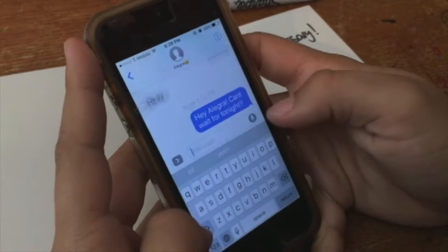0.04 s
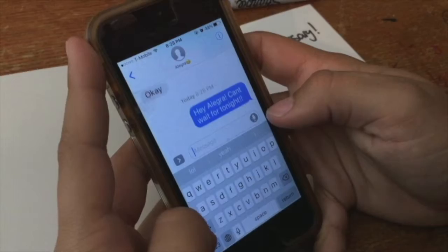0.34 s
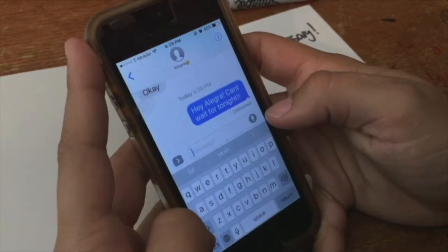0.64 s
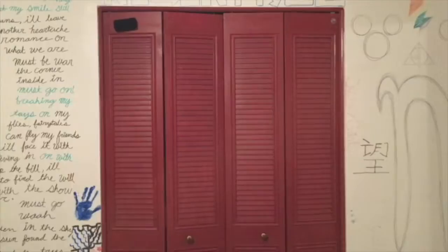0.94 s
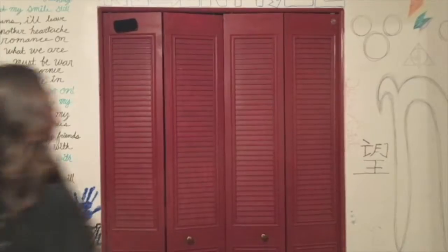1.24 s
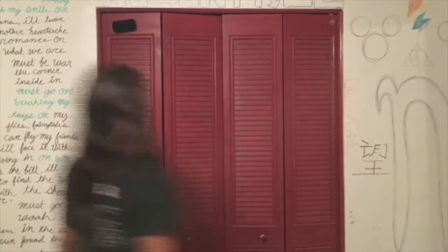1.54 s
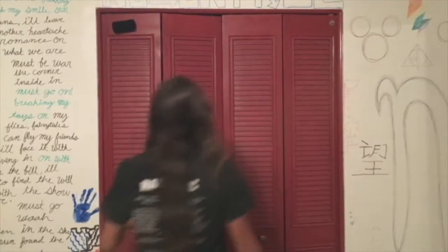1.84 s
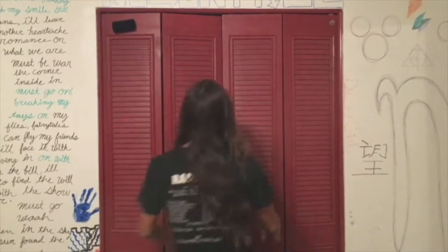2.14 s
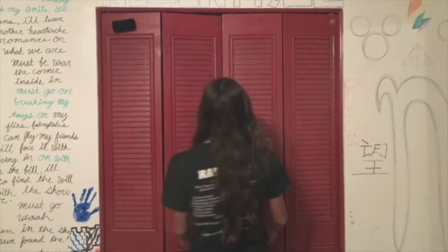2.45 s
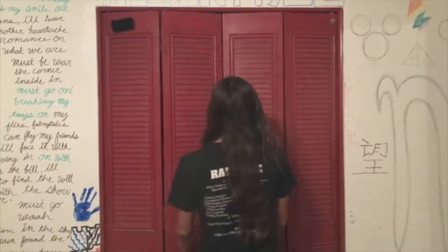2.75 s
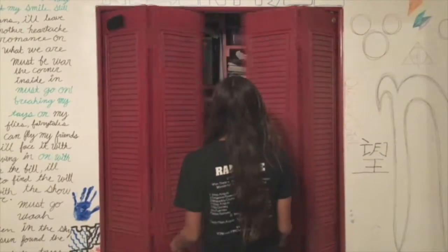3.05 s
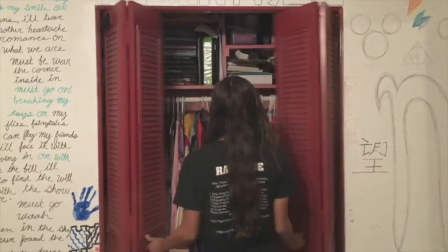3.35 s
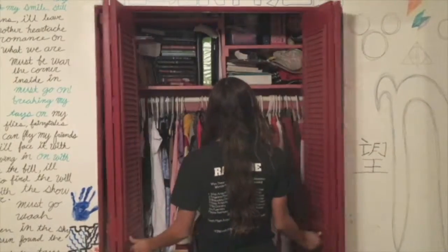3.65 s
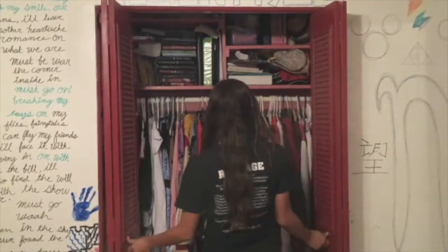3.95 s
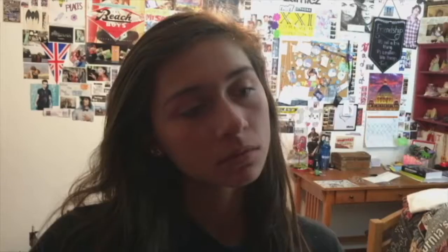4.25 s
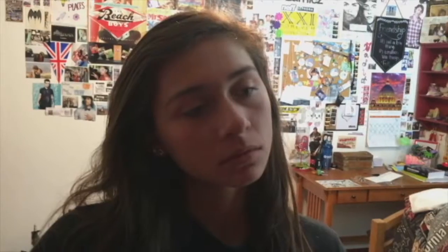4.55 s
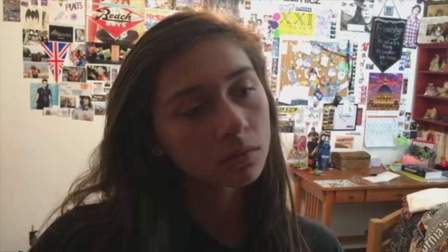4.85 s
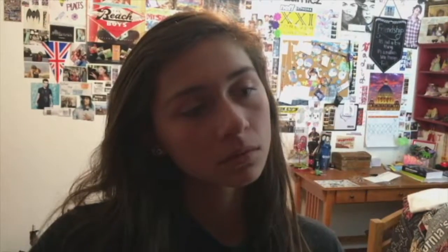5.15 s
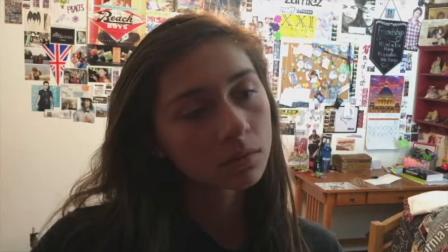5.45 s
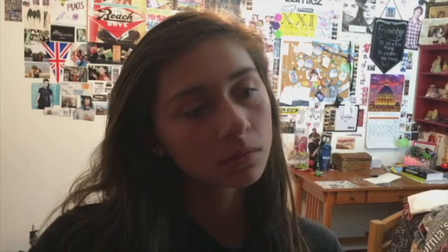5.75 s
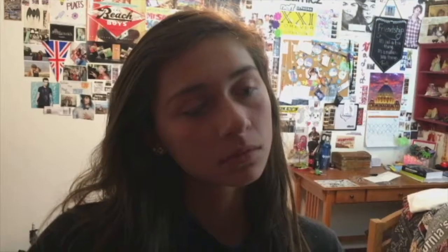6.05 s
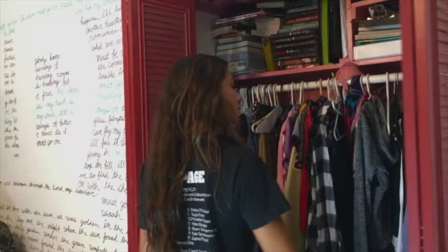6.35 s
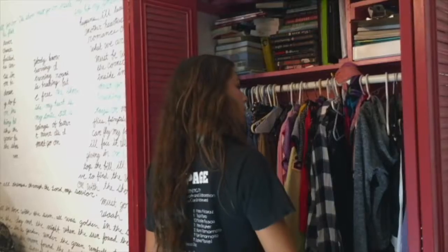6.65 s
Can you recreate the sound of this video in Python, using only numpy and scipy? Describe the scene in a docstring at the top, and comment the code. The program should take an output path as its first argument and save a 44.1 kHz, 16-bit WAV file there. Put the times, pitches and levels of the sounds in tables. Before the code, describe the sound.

After soft steps, folding wooden closet doors clatter and scrape open in a bedroom, and later plastic hangers tap lightly.

```python
"""Louvered wooden bifold closet doors pulled open in a small bedroom, after a few soft steps.
The doors pop free with a boom as the panels flex, and the loose slats rattle. Guide pins scrape along
the dry track, ring it, and squeal and judder by stick-slip. Doors and room tone then stop dead;
quiet room tone fades in, with a faint bump and a few light hanger clicks."""
import sys
import numpy as np
from scipy import signal
from scipy.fft import rfft, irfft, next_fast_len
from scipy.io import wavfile

SR = 44100
rng = np.random.default_rng(int(sys.argv[2]) if len(sys.argv) > 2 else 0)


def generate_wav(signal):
    """Clip the signal to [-1, 1] and save it as 16-bit WAV at the path in sys.argv[1]."""
    frames = np.transpose(np.atleast_2d(signal))
    scaled = np.clip(frames, -1, 1) * 32767
    pcm = np.round(scaled).astype(np.int16)
    wavfile.write(sys.argv[1], SR, pcm)


N = 299439
TIME = np.arange(N) / SR
BREAK_S, CUTOFF_HZ = 4.089, 15820
RUMBLE_DB, RUMBLE_DB_PER_DB = -45, 1.03   # panel drive at nominal drag; slope against drag
# metal track modes: f/Hz, level/dB
TRACK_MODES = [(640.6, -37), (802.1, -52.5), (1044, -48.5), (1211, -50), (1287, -40.5), (1620, -43),
               (1701, -43.5), (1857, -46), (1922, -43), (2099, -48.5), (2353, -54.5), (2568, -57.5)]


def from_db(db):
    """Decibels to gain."""
    return 10 ** (np.asarray(db) / 20)


def unit_rms(x):
    """Scale to rms 1."""
    return x / np.sqrt(np.mean(x ** 2) + 1e-20)


def at_hz(points, hz):
    """Interpolate a table over log frequency."""
    f, value = np.transpose(points)
    return np.interp(np.log(hz + 1e-3), np.log(f), value)


def band(x, low_hz, high_hz, order=2):
    """Causal band-pass."""
    sos = signal.butter(order, [low_hz, min(high_hz, .45 * SR)], "band", fs=SR, output="sos")
    return signal.sosfilt(sos, x + 1e-18)


def coloured(x, spectrum):
    """Shape a steady signal's spectrum; rms 1."""
    size = next_fast_len(N)
    hz = np.arange(size // 2 + 1) * SR / size
    return unit_rms(irfft(rfft(x, size) * from_db(at_hz(spectrum, hz)), size)[:N])


def noise():
    """White noise."""
    return rng.standard_normal(N)


def drift(rate_hz):
    """Random wander between unit-variance knots."""
    knots = rng.standard_normal(N // 4)
    return np.interp(TIME * rate_hz, np.arange(len(knots)), knots)


def ring(push, hz, t60_s):
    """One damped mode; a unit impulse rings at amplitude 1."""
    r, w = from_db(-60 / (t60_s * SR)), 2 * np.pi * hz / SR
    return signal.lfilter([0, np.sin(w)], [1, -2 * r * np.cos(w), r * r], push + 1e-18)


def impulses(times_s, levels_db):
    """One-sample pushes."""
    clicks = np.zeros(N)
    clicks[np.round(times_s * SR).astype(int)] = from_db(levels_db)
    return clicks


def bursts(times_s, levels_db, t60_s, rise_s):
    """Envelope of decaying blows, summed in power."""
    power = np.zeros(N)
    for s, db in zip(times_s, levels_db):
        start = round(s * SR)
        age = TIME[:min(SR // 2, N - start)]
        blow = from_db(db - 60 * age / t60_s) * (1 - np.exp(-age / rise_s))
        power[start:start + len(age)] += blow ** 2
    return np.sqrt(power)


def envelope(start_s, rise_s, hold_s, t60_s):
    """Linear attack, hold, exponential release."""
    age = TIME - start_s
    return np.clip(age / rise_s, 0, 1) * from_db(-60 * np.maximum(age - rise_s - hold_s, 0) / t60_s)


def swell(centre_s, width_s):
    """Gaussian rise and fall."""
    return np.exp(-((TIME - centre_s) / width_s) ** 2 / 2)


def bedroom(x, wet_db):
    """Direct sound plus a dense tail that dies sooner in the treble."""
    # room decay: f/Hz, t60/s
    decay = [(100, 0.39), (1000, 0.42), (5000, 0.17), (15000, .17)]
    age, edges_hz = TIME[:SR // 2], np.geomspace(60, 18000, 9)
    tail = 0
    for low, high in zip(edges_hz, edges_hz[1:]):
        t60_s = at_hz(decay, np.sqrt(low * high))
        tail += band(rng.standard_normal(len(age)), low, high) * from_db(-60 * age / t60_s)
    tail *= age > .003
    wet = from_db(wet_db)
    return (x + wet * signal.fftconvolve(x, tail / np.linalg.norm(tail))[:N]) / np.hypot(1, wet)


def room_tone():
    """Steady low rumble with faint hiss."""
    # room tone spectrum: f/Hz, density/dB
    spectrum = [(12, -35), (20, -11), (49, 0), (68, -6.5), (103, -21.5), (144, -21.5), (185, -27),
                (213, -26.5), (352, -28.5), (519, -36.5), (614, -34.5), (4550, -38.5), (4950, -42),
                (6020, -39.5), (15500, -40.5)]
    return from_db(-57.5) * coloured(noise(), spectrum)


def late_room_tone():
    """Quieter room tone, fading in after the break."""
    # room tone spectrum: f/Hz, density/dB
    spectrum = [(12, -49), (20, -8.5), (43, 1), (65, -8), (177, -18.5), (277, -24.5), (310, -23.5),
                (446, -28), (527, -32.5), (574, -30), (923, -32), (1060, -31), (4940, -36), (14700, -40.5),
                (16000, -39)]
    # fade-in: t/s, gain/dB
    fade = [(4.09, -29.5), (4.2, -18.5), (4.35, -12), (4.6, -6.5), (4.85, -4)]
    return from_db(-58.5 + np.interp(TIME, *np.transpose(fade))) * coloured(noise(), spectrum)


def bump():
    """A faint, muffled bump."""
    # bump spectrum: f/Hz, density/dB
    spectrum = [(30, -4), (110, 1), (560, -15.5), (900, -26), (3000, -60.5)]
    thud = from_db(-61) * swell(centre_s=5.46, width_s=.045) * coloured(noise(), spectrum)
    return bedroom(thud, wet_db=-9)


def steps():
    """Soft footfalls and weight shifts: a brush of cloth and a dull thud."""
    # footfalls: t/s, brush/dB, width/s, thud/dB
    footfalls = [(1.062, -64, .041, -72), (1.139, -61, .012, -63), (1.297, -66, 0.027, -69),
                 (1.386, -63.5, 0.013, -74), (1.503, -62.5, 0.038, -73.5), (1.689, -56.5, 0.022, -68.5),
                 (1.932, -66, 0.097, -62.5)]
    # brushing clothes: f/Hz, density/dB
    cloth_spectrum = [(300, -18), (700, -4.5), (1400, 0.5), (2300, -3.5), (4000, -9.5), (7000, -16.5),
                      (16000, -23)]
    brush = sum(from_db(db) * swell(s, width_s) for s, db, width_s, _ in footfalls)
    thud = sum(from_db(db) * swell(s, width_s) for s, _, width_s, db in footfalls)
    cloth = coloured(noise(), cloth_spectrum) * from_db(2.5 * drift(180))
    return bedroom(brush * cloth + thud * unit_rms(band(noise(), 110, 420)), wet_db=-7.5)


def hangers():
    """Plastic hangers touch in a quick run of light taps."""
    # contacts: t/s, level/dB
    contacts = [(6.3418, -42.5), (6.346, -45), (6.3587, -44), (6.3777, -47), (6.402, -48.5)]
    # plastic tap: f/Hz, density/dB
    spectrum = [(290, -49), (500, -26.5), (819, -9), (1230, -8.5), (1550, -13), (2040, -2), (2770, -10),
                (3020, -10), (4030, -4.5), (5970, -8.5), (7530, -18), (16000, -19)]
    s, db = np.transpose(contacts)
    taps = coloured(noise(), spectrum) * bursts(s, db - 7, t60_s=.07, rise_s=.0004)
    return bedroom(taps, wet_db=-4)


def swing_speed():
    """Speed of the folding doors, 0-1."""
    start_s, rise_s, run_s, slow_s = 2.922, .11, .43, .23
    return np.interp(TIME, np.cumsum([start_s, rise_s, run_s, slow_s]), [0, 1, 1, 0])


def shudder_db():
    """Extra drag as the doors pop free and as they settle."""
    # shudders: t/s, width/s, gain/dB
    shudders = [(2.269, .055, 6), (3.86, 0.042, 8)]
    return sum(db * swell(s, width_s) for s, width_s, db in shudders)


def drag_gain(level_db, db_per_db):
    """Gain that follows pin drag once the pull starts; level_db at nominal drag."""
    # pin drag in the track: t/s, level/dB
    drag = [(2.63, -42), (2.662, -46), (2.67, -40), (2.776, -45.5), (2.816, -39), (2.872, -44),
            (3.082, -47), (3.094, -42), (3.244, -34), (3.51, -55.5), (3.536, -46), (3.602, -58),
            (3.68, -61.5)]
    pull_s, rise_s = 2.065, .038
    pull_db, nominal_db, settled_db = -54, -43, -65
    curve = [(pull_s, pull_db), *drag, (BREAK_S, settled_db)]
    drag_db = np.interp(TIME, *np.transpose(curve)) + shudder_db()
    onset = np.clip((TIME - pull_s) / rise_s, 0, 1)
    return onset * from_db(level_db + db_per_db * (drag_db - nominal_db))


def glide():
    """Steady friction keeps the track's high resonances singing during the swing."""
    # high track resonances: f/Hz, width/Hz, level/dB
    resonances = [(5780, 940, 1.5), (14440, 4200, -4)]
    sing = sum(from_db(db) * unit_rms(band(noise(), hz - width / 2, hz + width / 2))
               for hz, width, db in resonances)
    friction = swing_speed() * drag_gain(-54.5, db_per_db=.26) * from_db(2 * drift(70))
    return bedroom(friction * sing, wet_db=0)


def slide():
    """Pins catch densely on the dry track, shaking panels and track; speed brightens the scrape."""
    # scraped panels: f/Hz, density/dB
    spectrum = [(59, -33.5), (100, -0.5), (170, -13.5), (224, -2.5), (424, -6.5), (471, -8), (547, -6.5),
                (721, -2.5), (801, -4.5), (1480, -5), (2220, -11.5), (5080, -13), (10700, -27.5),
                (16000, -19.5)]
    catches_per_s = 1000
    sizes = from_db(3 * np.minimum(rng.exponential(1, N), 4)) * rng.choice([-1, 1], N)
    catches = unit_rms(sizes * (rng.random(N) < catches_per_s / SR))
    friction = (catches + .4 * noise()) * from_db(2.2 * drift(55))
    track = unit_rms(sum(from_db(db) * ring(friction, hz, t60_s=.072) for hz, db in TRACK_MODES))
    shake = bedroom(coloured(friction, spectrum), wet_db=-2) + from_db(-11) * track
    low, mid, high = (unit_rms(band(shake, *edges_hz, order=3))
                      for edges_hz in [(110, 400), (400, 2600), (3300, 21000)])
    speed = swing_speed()
    rumble = drag_gain(RUMBLE_DB, RUMBLE_DB_PER_DB) * from_db(-5 * speed) * low
    scrape = drag_gain(-43, db_per_db=1) * mid
    hiss = drag_gain(-57.5, db_per_db=.85) * from_db(10.5 * speed + .8 * shudder_db()) * high
    return rumble + scrape + hiss


def squeal(start_s, length_s, peak_at, start_hz, middle_hz, end_hz, level_db, overtone_db, rough):
    """Fast stick-slip: a tone swells and fades along a pitch arc; uneven slips smear its partials."""
    jitter, smear_rad, fall_db, flutter_db, max_partials = .04, 1.2, 2, 4.6, 11
    live = (TIME > start_s) & (TIME < start_s + length_s)
    progress = (TIME[live] - start_s) / length_s
    arc_hz = np.polyval(np.polyfit([0, .5, 1], [start_hz, middle_hz, end_hz], 2), progress)
    pitch_hz = arc_hz * (1 + jitter * rough * (drift(900) + .4 * drift(200))[live])
    phase = 2 * np.pi * np.cumsum(pitch_hz) / SR
    edge_db = -23 + 15.5 * rough   # rough squeals hold up at both ends
    db = level_db + edge_db * np.interp(progress, [0, peak_at, 1], [1, 0, 1])
    tone = np.zeros(N)
    for k in range(1, min(max_partials, int(CUTOFF_HZ / arc_hz.min())) + 1):
        partial_db = (k > 1) * (overtone_db - fall_db * (k - 2)) + flutter_db * drift(170)[live]
        partial = np.sin(k * phase + smear_rad * rough * drift(1500)[live])
        tone[live] += from_db(db + partial_db) * partial * (k * pitch_hz < SR / 2)
    return tone


def squeals():
    """Pins chirp and squeal, raspier as they bind; a hinge squeaks last."""
    # pin and hinge squeals: t/s, length/s, peak position/0-1, start f/Hz, middle f/Hz, end f/Hz,
    # level/dB, overtone/dB, roughness/0-1
    slips = [(2.357, .095, .48, 5836, 6080, 6050, -38, 2.5, .34),
             (2.408, 0.14, .22, 5260, 5096, 5103, -35.5, -.5, 0.33),
             (2.474, .165, .5, 6070, 5590, 7153, -36, -0.5, .62),
             (2.853, .2, 0.57, 6350, 4050, 3147, -40.5, -7, 0.92),
             (3.899, .145, 0.39, 880, 1009, 1200, -55, -2, 0.4)]
    # pin chirps: t/s, f/Hz, level/dB, t60/s
    pin_chirps = [(2.238, 7650, -42.5, 0.11), (2.274, 8500, -37, 0.098), (2.294, 7700, -44, .09),
                  (2.335, 15200, -30, 0.035), (2.461, 7800, -45.5, .1)]
    tones = sum(squeal(*row) for row in slips)
    chirps = sum(unit_rms(band(noise(), .97 * hz, 1.03 * hz)) * bursts([s], [db], t60_s, rise_s=.0014)
                 for s, hz, db, t60_s in pin_chirps)
    return from_db(.5) * bedroom(tones + chirps, wet_db=-4)


def judder():
    """A binding pin slips hundreds of times a second; the track's ring darkens as pressure eases."""
    start_s, rise_s, slips_per_s = 2.488, .019, 325
    high_hz, low_hz, first_octave_s = 1900, 700, .087
    # slip rasp: f/Hz, density/dB
    spectrum = [(1700, 0), (2800, -3), (4050, -0.5), (5500, -8), (8000, -9.5), (15000, -7.5)]
    centre_hz = np.maximum(high_hz * .5 ** (((TIME - start_s) / first_octave_s) ** 2), low_hz)
    tones = power = 0
    for hz, db in TRACK_MODES:
        weight = from_db(db - 5.9 * np.log2(hz / centre_hz) ** 2)
        tones += weight * np.sin(2 * np.pi * np.cumsum(hz * (1 + .007 * drift(200))) / SR)
        power += weight ** 2 / 2
    slip_count = np.floor(np.cumsum(slips_per_s * (1 + .05 * drift(300))) / SR)
    slips = np.diff(slip_count, prepend=0) * from_db(3.5 * drift(300))
    rasp = unit_rms(band(coloured(slips, spectrum), 1700, 16000))
    ring_gain = from_db(-27) * envelope(start_s, rise_s, hold_s=.05, t60_s=.16)
    rasp_gain = from_db(-29.5) * envelope(start_s, rise_s, hold_s=.016, t60_s=.12)
    return ring_gain * tones / np.sqrt(power) + bedroom(rasp_gain * rasp, wet_db=2)


def door_boom():
    """Shoves and track drag sway the hanging doors in two low modes; jolts set the frames humming."""
    # shoves flexing the door: t/s, level/dB, quick-mode share/0-1
    shoves = [(1.831, -38.5, 0.26), (1.971, -38.5, 0.17), (2.167, -20, 0), (2.198, -11.5, 0.04),
              (2.273, -22.5, .95), (2.384, -19.5, .62), (2.579, -34, 0.37), (3.08, -36, 0.3),
              (3.245, -22.5, 0.5), (3.482, -34.5, 0.18), (3.642, -42.5, .03), (3.85, -40, 0.04)]
    # jolts as the doors are gripped, pop free, bind, fold and stop: t/s, level/dB
    jolts = [(1.89, -54), (2.198, -24), (2.29, -37.5), (2.52, -35.5), (3.079, -36), (3.245, -33),
             (3.38, -39)]
    # slat frame modes: f/Hz, level/dB, t60/s
    frame_modes = [(219.8, -4.5, .35), (259.3, -5.5, .25), (313, -12.5, 0.27), (343, -14.5, 0.034)]
    s, push_db, share = np.transpose(shoves)
    share = np.clip(share, .01, .99)
    drag = drag_gain(RUMBLE_DB, RUMBLE_DB_PER_DB) * noise()
    slow_push = impulses(s, push_db + 20 * np.log10(1 - share)) + from_db(-30.5) * drag
    quick_push = impulses(s, push_db + 20 * np.log10(share)) + from_db(-37) * drag
    slow = band(ring(slow_push, hz=45.26, t60_s=.55), 25, 70)
    quick = band(ring(quick_push, hz=78.3, t60_s=.35), 57, 94)
    frame_push = impulses(*np.transpose(jolts))
    frame = sum(from_db(db) * ring(frame_push, hz, t60_s) for hz, db, t60_s in frame_modes)
    return slow + quick + band(frame, 210, 400)


def door_knocks():
    """Each knock shakes many loose slats: bright crack, clack, longer low body and ringing wood."""
    # wood striking wood and track: t/s, level/dB, treble/dB
    knocks = [(1.881, -40.5, -2.5), (1.919, -38, 1.5), (2.066, -32, -0.5), (2.076, -29.5, 0.5),
              (2.096, -23.5, 1.5), (2.145, -26.5, 5), (2.161, -25, 4), (2.166, -10, 0), (2.187, -25.5, 7),
              (2.241, -27, 1), (2.273, -22, 2), (2.314, -30, 6.5), (2.335, -20.5, 1), (2.461, -29.5, 1),
              (2.595, -30.5, 5), (2.677, -32.5, -1), (2.717, -30, 2.5), (2.804, -36.5, 1.5),
              (2.909, -32, 3), (3.032, -32.5, 8), (3.094, -26, -2.5), (3.169, -23, -7), (3.222, -19, 0.5),
              (3.25, -26, -12), (3.526, -39, 2), (3.72, -40, -21), (3.808, -38, 3), (3.858, -45.5, -2),
              (4.078, -41.5, 3)]
    # struck wood: f/Hz, density/dB
    spectrum = [(88, -38.5), (150, -9.5), (244, -4.5), (457, -25), (790, -8.5), (960, -7), (1190, 6),
                (1340, -15), (1530, -8.5), (2100, -12.5), (2270, -10.5), (2550, -14.5), (4760, -15.5),
                (5790, -10), (16000, -39.5)]
    # slat modes: f/Hz, level/dB, t60/s
    slat_modes = [(765, -27.5, 0.27), (1157, -24.5, 0.41), (1248, -25.5, 0.35), (2244, -15, 0.047),
                  (2420, -21, 0.17)]
    s, db, treble_db = np.transpose(knocks)
    wood = coloured(noise(), spectrum)
    body = band(wood, 150, 1300) * bursts(s, db - 5, t60_s=.1744, rise_s=.0027)
    clack = band(wood, 1300, 6500) * bursts(s, db - 3 + .4 * treble_db, t60_s=.136, rise_s=.0008)
    crack = band(wood, 8400, 16000) * bursts(s, db + 3.5 + treble_db, t60_s=.0608, rise_s=.00097)
    slats = sum(ring(impulses(s, db + mode_db + rng.normal(0, 1.1, len(s))), hz, t60_s)
                for hz, mode_db, t60_s in slat_modes)
    return from_db(-3) * bedroom(body + clack + crack, wet_db=-10) + from_db(-2.5) * slats


def scene():
    """Mono mix; doors and room tone stop dead at BREAK_S and a quieter room tone swells up."""
    doors = door_knocks() + door_boom() + slide() + glide() + squeals() + judder()
    mix = np.where(TIME < BREAK_S, doors + room_tone(), late_room_tone())
    return (mix + steps() + bump() + hangers())[None]


def record(dry):
    """Steep elliptic low-pass."""
    return signal.sosfilt(signal.ellip(12, .1, 80, CUTOFF_HZ, fs=SR, output="sos"), dry)


dry = scene()
out = record(dry)
generate_wav(out)
```